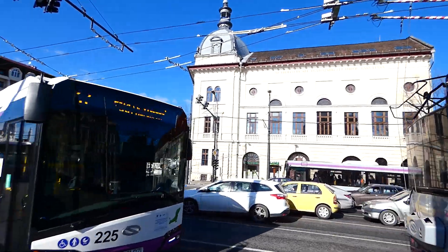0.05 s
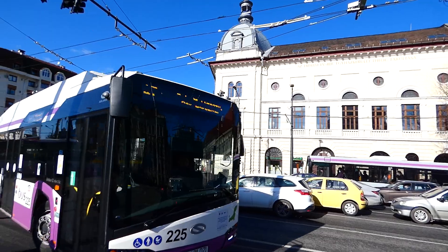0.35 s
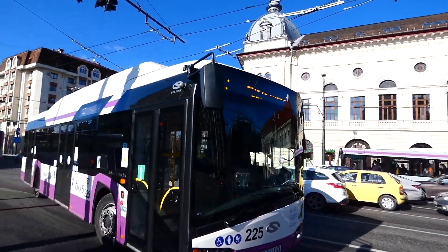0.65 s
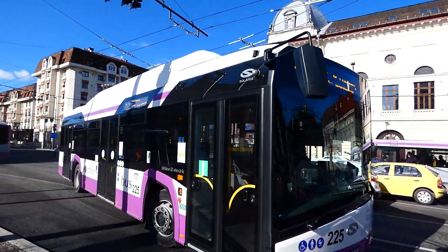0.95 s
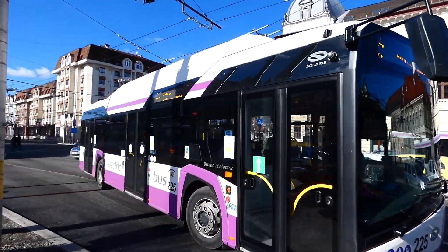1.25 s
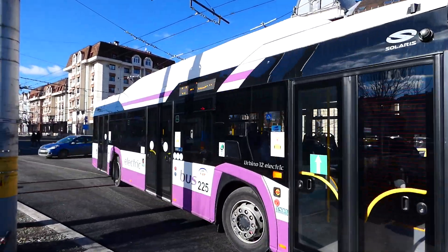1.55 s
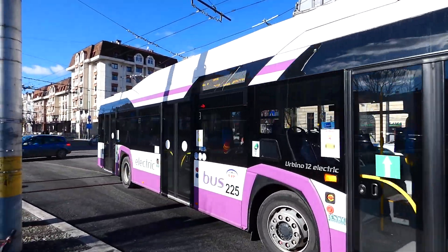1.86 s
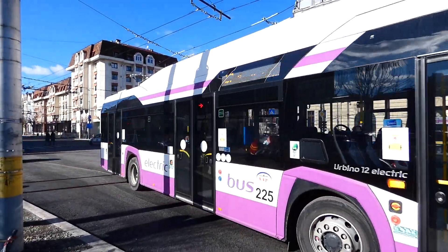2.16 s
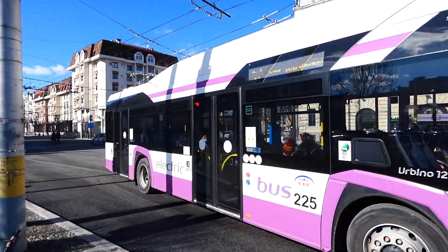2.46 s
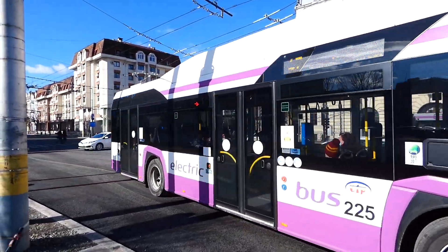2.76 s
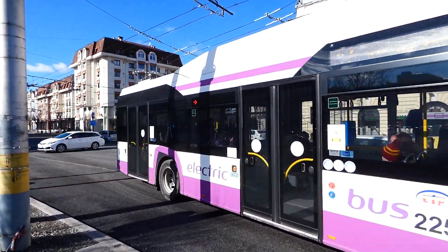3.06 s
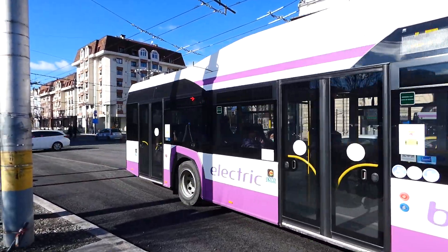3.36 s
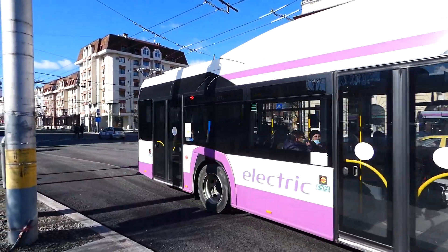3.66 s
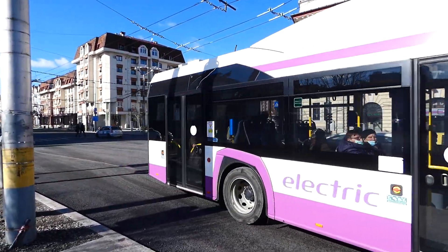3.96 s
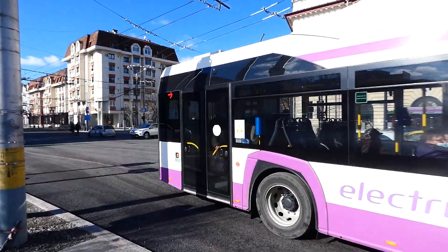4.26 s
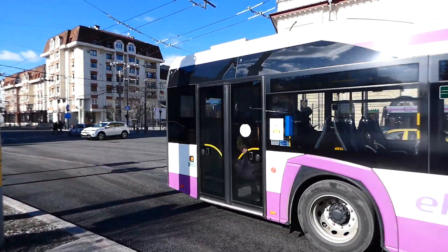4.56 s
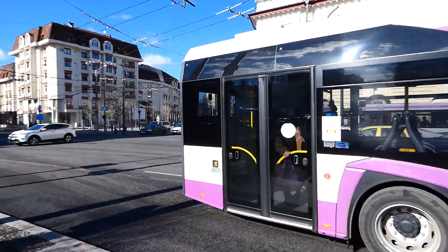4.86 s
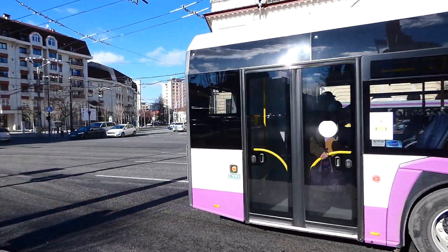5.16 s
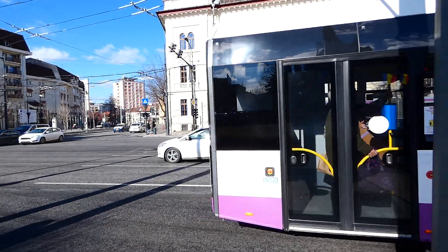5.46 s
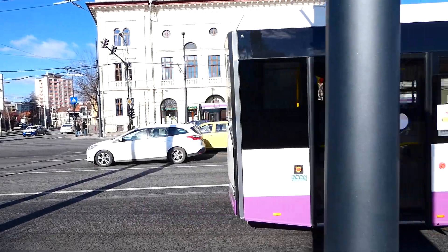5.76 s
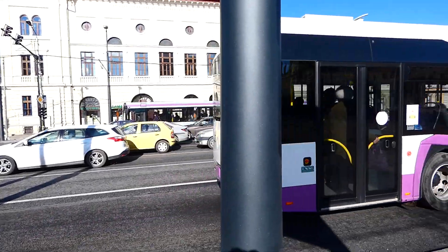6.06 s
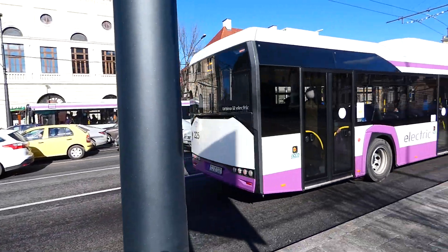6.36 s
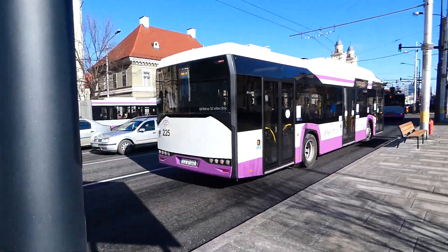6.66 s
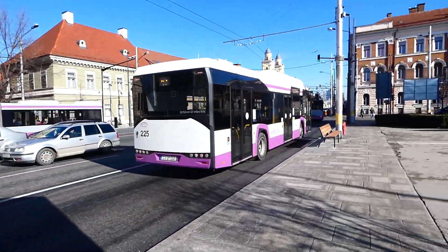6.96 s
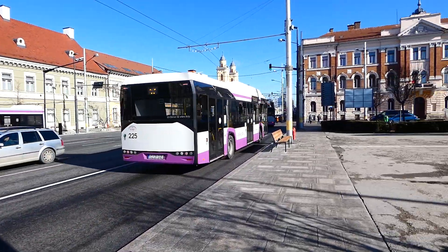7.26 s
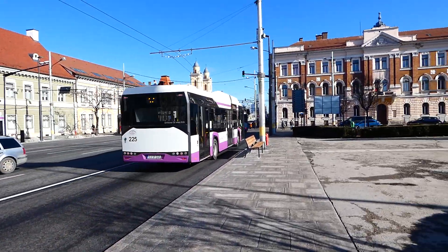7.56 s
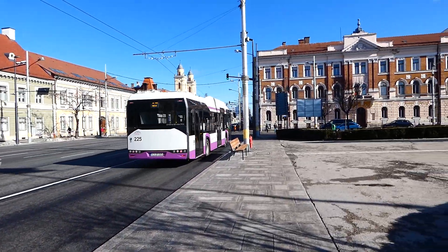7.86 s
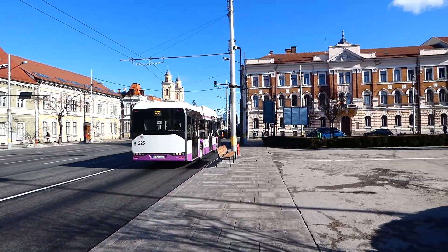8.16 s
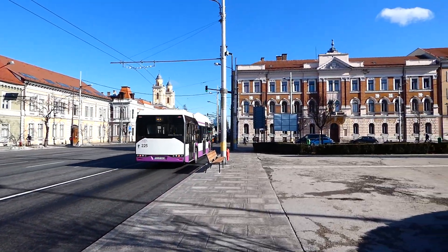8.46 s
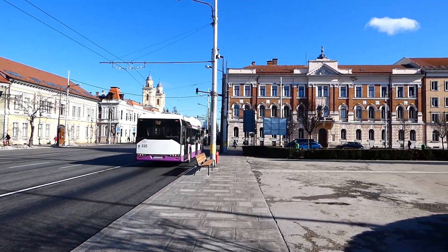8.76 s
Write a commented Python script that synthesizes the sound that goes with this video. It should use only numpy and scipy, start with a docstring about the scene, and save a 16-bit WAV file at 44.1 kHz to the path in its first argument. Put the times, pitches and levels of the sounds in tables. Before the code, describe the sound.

Gusty wind buffets the microphone with irregular thuds and slaps, standing out over the rumble of city traffic. Behind it an electric bus passes close by, humming, its tyres rushing on the asphalt and its drive whining faintly. It gives a short spit of air, a few faint squeaks, then a sharp, ringing air release. A last, softer hiss follows as it moves away and the sound of other cars rises.

```python
"""First come a low hum and the roar of tyres: an electric bus rolls slowly past on a city street.
Its drive sings a thin, gliding whine, something rubs and squeaks, and its air valves let off three
hissing bursts, the second sharp and ringing. Distant engines rumble, and more cars are heard once the
bus has gone by. All along, gusts throw eddies (little swirls of air) against the microphone, and its
automatic volume control turns everything down under the hardest thumps."""
import sys
import numpy as np
from scipy import signal
from scipy.fft import rfft, irfft, next_fast_len
from scipy.io import wavfile
from scipy.ndimage import uniform_filter1d, map_coordinates

SR = 44100
rng = np.random.default_rng(int(sys.argv[2]) if len(sys.argv) > 2 else 0)


def generate_wav(signal):
    """Clip the signal to [-1, 1] and save it as 16-bit WAV at the path in sys.argv[1]."""
    frames = np.transpose(np.atleast_2d(signal))
    scaled = np.clip(frames, -1, 1) * 32767
    pcm = np.round(scaled).astype(np.int16)
    wavfile.write(sys.argv[1], SR, pcm)


N = 392931

# Levels are relative: the functions add their own gains. Pan is left minus right.
# how loud each layer is as time goes by: (time [s], level [dB])
TYRE_LEVELS = [(0, -32.5), (0.42, -29.5), (0.7, -32.5), (1.1, -30), (1.62, -31.5), (1.9, -27), (2.2, -30),
               (2.88, -33), (3.3, -38.5), (3.65, -36.5), (4.2, -33), (4.55, -32), (5.04, -31.5),
               (5.15, -33.5), (6.05, -36), (6.58, -31), (7.0, -34.5), (7.6, -30.5), (8.9, -31.5)]
CAR_LEVELS = [(0, -50), (6.2, -49.5), (7.3, -41), (8.0, -32.5), (8.3, -32), (8.9, -30.5)]
ENGINE_LEVELS = [(0, -35), (1, -27), (2, -26.5), (3.1, -39), (3.35, -38), (3.7, -34), (4.5, -35.5),
                 (5, -30.5), (5.2, -47.5), (6.5, -32.5), (7.1, -29), (8.1, -32), (8.9, -31.5)]
# the tones of the electric drive: (time [s], pitch [Hz], level [dB])
ARCHING_WHINE = [(0.4, 8750, -74), (0.8, 9020, -66), (1.05, 9340, -71), (1.3, 9640, -68.5),
                 (1.55, 9890, -71), (1.75, 10050, -67.5), (1.95, 10100, -65.5), (2.25, 9900, -67.5),
                 (2.6, 9560, -65), (2.8, 9230, -69), (3.0, 8890, -67), (3.3, 8620, -75)]
RISING_WHINE = [(3.25, 6900, -68), (3.5, 7100, -62), (4.1, 7630, -64), (4.5, 7975, -64), (4.57, 8035, -55),
                (4.66, 8115, -66), (4.93, 8350, -63), (5.15, 8550, -71), (5.45, 8820, -68),
                (5.7, 9050, -75), (6.1, 9435, -82), (6.5, 9750, -80)]
GEAR_WHINE = [(1.35, 1040, -53), (1.55, 1050, -50), (1.7, 1065, -54), (1.81, 1080, -43), (1.93, 1095, -48),
              (2.1, 1125, -55)]
OPENING_HUM = [(0, 554, -35), (0.15, 541, -46), (0.45, 543, -37.5)]
FRONT_HUM = [(0.6, 190.3, -37.5), (1.05, 199, -33.5), (1.45, 209, -36)]
REAR_HUM = [(3.5, 216.7, -37), (3.78, 222, -35), (3.95, 223, -36.5), (4.1, 224, -40), (4.32, 226, -38),
            (4.55, 228, -41)]
AXLE_HUM = [(4.15, 195, -41), (4.4, 199, -37.5), (4.6, 201, -37)]
# air let off, the last two rows as one burst; a fade is the time to drop 60 dB:
# (time [s], level [dB], rise [s], blast fade [s], tail level [dB], tail fade [s], ring [dB], pan [dB])
AIR_BURSTS = [(0.346, -19.3, 0.02, 0.33, -16.5, 0.6, -12, -2.5),
              (3.763, -26.5, 0.0105, 0.42, 1.5, 1.6, 3, -4.5),
              (7.602, -28.8, 0.017, 0.85, -2, 1.9, -8, 2.8), (7.805, -38.5, 0.03, 0.45, -9, 0.44, -20, 2)]
# pitches at which the air outlet and the nozzle ring: (pitch [Hz], width [Hz], boost [dB])
OUTLET_RINGS = [(2370, 130, 16.5), (2770, 90, 3), (3520, 110, 6)]
NOZZLE_RINGS = [(5250, 250, 4), (6550, 200, 5), (7050, 380, 8), (7500, 200, 4), (8750, 260, 8)]
# valves snapping open: (time [s], level [dB], centre [Hz], width [Hz], fade [s])
VALVE_SNAPS = [(0.346, -24, 6000, 3400, .018), (3.757, -29, 6400, 2200, .025),
               (7.599, -37, 4800, 2600, .16)]
# rubs near the wheels: (time [s], level [dB])
SQUEAKS = [(1.09, -47), (1.19, -43), (1.285, -41), (1.38, -42), (1.455, -41), (1.53, -44), (1.62, -43.5),
           (1.71, -43), (2.92, -46)]
# gusts; deep ones thud, shallow ones slap: (start [s], length [s], level [dB], depth [dB])
GUSTS = [(0.3, 0.16, -24.5, -6.5), (0.477, 0.1, -22, -9), (0.535, 0.12, -14, -3.5),
         (0.811, 0.19, -26.5, 4.5), (1.126, 0.075, -26, 8.5), (1.468, 0.092, -16.5, -5.5),
         (1.69, 0.042, -23.5, 4.5), (1.979, 0.694, -17, -2), (2.703, 0.064, -17.5, 5),
         (2.791, 0.052, -20, 0.5), (2.845, 0.39, -16.5, 1), (3.447, 0.1, -25.5, 6), (4.14, 0.04, -28.5, 6),
         (4.29, 0.35, -31, -3), (4.627, 0.06, -19.5, 8), (4.823, 0.026, -17, -5.5),
         (5.043, 0.089, -12, -0.5), (5.155, 0.063, -14.5, 0), (5.275, 0.21, -17, -3),
         (5.515, 0.14, -16, -0.5), (5.715, 0.18, -29.5, 9), (5.891, 0.185, -23, 9.5),
         (6.105, 0.269, -22, -3.5), (6.614, 0.14, -26, 3.5), (6.763, 0.15, -18.5, -2),
         (7.116, 0.029, -18.5, 6.5), (7.175, 0.11, -22, -5), (7.44, 0.345, -21.5, -6.5),
         (7.802, 0.13, -21.5, 2.5), (7.971, 0.14, -24, -3.5)]
# the biggest single eddies: (time [s], level [dB], pitch [Hz], half length [s])
THUMPS = [(0.234, -11.5, 320, 0.0025), (0.503, -18, 320, 0.0035), (0.574, -11.5, 268, 0.0081),
          (0.62, -15, 150, 0.008), (0.655, -9, 130, 0.0062), (0.907, -15, 300, .005),
          (0.929, -16.5, 276, 0.0078), (1.137, -17, 330, 0.0036), (1.289, -11, 253, 0.0031),
          (1.419, -10.5, 178.6, 0.0034), (1.505, -12, 273, 0.0076), (1.568, -13, 159, 0.0059),
          (1.622, -13.5, 333, 0.0036), (1.731, -16.5, 220, 0.0035), (2.011, -14, 240, 0.0056),
          (2.07, -11, 171, 0.008), (2.589, -8, 192, 0.005), (2.747, -16, 150, .008),
          (2.883, -12, 346, 0.0064), (2.921, -10, 235, 0.0096), (3.095, -16, 130, 0.0094),
          (3.12, -8, 181, .006), (3.288, -8.5, 224, 0.0041), (3.457, -14, 210, .004),
          (3.471, -13, 330, 0.0037), (3.49, -5, 320, 0.0026), (3.506, -16, 248, 0.0045),
          (3.514, -9, 347, 0.006), (3.549, -17, 302, 0.0032), (4.135, -19, 150, 0.0053),
          (4.161, -21, 320, 0.0055), (4.655, -13.5, 130, 0.0073), (4.845, -13.5, 310, 0.0076),
          (5.07, -10.5, 275, .005), (5.106, -5, 168, 0.0059), (5.125, -3.5, 316, 0.0048),
          (5.18, -6, 228, 0.0028), (5.314, -4.5, 293, 0.0036), (5.437, -7, 243, 0.0046),
          (5.603, -6, 140, .007), (5.895, -10, 146, 0.0058), (5.97, -14.5, 232, .007),
          (6.075, -18, 257, .006), (6.321, -15, 272, 0.0056), (6.655, -17, 154, 0.006),
          (6.716, -12, 208, 0.0056), (6.81, -11, 158, 0.0044), (6.901, -19, 320, 0.0097),
          (7.149, -13, 243, 0.0065), (7.234, -16, 310, 0.0049), (7.312, -10.5, 295, 0.0038),
          (7.541, -10, 297, 0.0054), (7.68, -18, 138, 0.0065), (7.857, -14, 250, 0.005),
          (7.895, -17, 130, .008)]
# hard eddies that hit one side of the microphone: (time [s], level [dB], pan [dB])
CRACKS = [(0.575, -2.5, -15), (1.137, -5, -12), (1.621, -10, -17), (2.112, -6, -20), (2.19, -8.5, -15),
          (2.371, -6, -19), (2.649, -8, -8), (2.955, 0, -25), (3.088, -12, -20), (3.096, -3, -11),
          (3.157, -10.5, -15), (3.189, -3, -32), (3.202, -6.5, -12), (3.222, -5, -25), (3.282, -10.5, -20),
          (3.511, -6.5, 17), (5.526, -9, -16), (5.6, -8.5, -11), (6.809, -11, -7), (6.849, -6, -8),
          (7.135, -11.5, -12), (7.148, -23, -8)]
# how each noise shares its strength from bass to treble: (frequency [Hz], level [dB])
ROAR_SPECTRUM = [(100, -30.5), (300, -13), (520, -0.5), (800, -1), (1300, -1.5), (2000, -8), (3000, -17.5),
                 (5000, -39.5), (10000, -55.5)]
HISS_SPECTRUM = [(800, -27.5), (2000, 0), (3000, 0.5), (4200, -4.5), (5500, -8.5), (7200, -11.5),
                 (8200, -19), (9900, -25), (10800, -44), (15000, -61)]
JET_SPECTRUM = [(500, -23), (1500, 5), (2400, 1.5), (3500, 0.5), (5000, -7), (5900, -9.5), (7100, -6.5),
                (8200, -14), (10500, -18.5), (11500, -30), (15000, -41)]
THUD_SPECTRUM = [(20, -35), (40, -42), (60, -22), (110, -4), (170, -1), (260, -1), (400, -8), (600, -14),
                 (1000, -24.5), (2000, -41), (5000, -73), (12000, -92)]
SLAP_SPECTRUM = [(40, -51), (120, -16), (250, -11), (380, -4.5), (600, -8), (1000, -24.5), (2000, -36),
                 (5000, -62), (12000, -94)]
CRACK_SPECTRUM = [(40, -38.5), (150, -14), (400, 5.5), (800, -2.5), (1400, -14.5), (2500, -33), (5000, -51),
                  (12000, -74.5)]
CAR_SPECTRUM = [(200, -31), (450, -7), (750, 2), (1000, -3.5), (1400, -4), (2200, -26), (4000, -34.5),
                (7000, -31.5), (9500, -41), (11000, -65)]
ENGINE_SPECTRUM = [(20, -34.5), (40, -16), (65, -3.5), (120, 0.5), (200, 3), (320, 1), (500, -10),
                   (900, -16), (2500, -66.5)]
# how alike left and right sound: (frequency [Hz], likeness [0 to 1])
STREET_ALIKE = [(60, 0.94), (500, 0.93), (1100, 0.8), (5000, 0.88), (10000, 0.39)]
WIND_ALIKE = [(60, 0.9), (150, 0.97), (270, 0.9), (450, 0.48), (700, 0), (2000, 0)]

TIME = np.arange(N) / SR


def tyres(pass_s=4.47, turn_s=0.99):
    """Tyres roar and hiss on the road; once the bus is past they sound duller and further left."""
    level_db, = curves(TYRE_LEVELS)
    past = (1 + np.tanh((TIME - pass_s) / turn_s)) / 2  # 0 as the bus comes, 1 as it leaves
    hiss_db = level_db - 6 - 5.5 * past
    roar = amp(level_db + 2 + 0.42 * wobble(18)) * street_noise(ROAR_SPECTRUM, patchy_db=1)
    hiss = amp(hiss_db + 0.21 * wobble(25)) * street_noise(HISS_SPECTRUM, patchy_db=1.03)
    pan_db = 1.2 + 1.3 * past
    return (roar + hiss) * amp(np.array([pan_db, -pan_db]) / 2)


def drive():
    """The electric drive whines and hums, its tones mostly rising as the bus gathers speed."""
    high = whine(ARCHING_WHINE, width_hz=280, direct_db=-17, echo_db=-0.5, waver_db=3)
    high += whine(RISING_WHINE, width_hz=170, direct_db=-14, echo_db=0, waver_db=2, pan_db=-4)
    low = whine(GEAR_WHINE, width_hz=30, direct_db=1.5, echo_db=3)
    for hum in (FRONT_HUM, REAR_HUM, AXLE_HUM):
        low += whine(hum, width_hz=42, direct_db=-1.5, echo_db=2.5, waver_db=-0.5)
    low += whine(OPENING_HUM, width_hz=49, direct_db=-3, echo_db=2)
    return high + low


def whine(track, width_hz, direct_db, echo_db, waver_db=0, pan_db=0):
    """One gliding tone: a clean part, plus a part blurred by echoes from the road and walls."""
    pitch_hz, level_db = curves(track)
    fade = np.clip(np.minimum(TIME - track[0][0], track[-1][0] - TIME) / 0.05, 0, 1)
    phase = 2 * np.pi * np.cumsum(pitch_hz) / SR
    blur = [wobble(width_hz) * np.sin(phase) + wobble(width_hz) * np.cos(phase) for _ in range(2)]
    direct = np.sqrt(2) * np.sin(phase)
    tone = amp(direct_db) * direct + amp(echo_db) * spread(np.array(blur), STREET_ALIKE)
    return fade * amp(level_db + waver_db * wobble(18)) * tone * panned(pan_db)


def air_valves(gain_db=-9, sputter_db=0.65):
    """A valve opens, the first blast rings in its outlet, and the air drains in a sputtering hiss."""
    jet = shaped_noise(lambda hz: amp(along(JET_SPECTRUM, hz)) * (1 + ringing(hz, NOZZLE_RINGS)))
    jet *= amp(sputter_db * wobble(150))
    ring = filtered(jet, lambda hz: ringing(hz, OUTLET_RINGS))
    out = np.zeros((2, N))
    for start, db, rise_s, fade_s, tail_db, tail_s, ring_db, pan_db in AIR_BURSTS:
        age = np.maximum(TIME - start, 0)
        opening = np.exp(-(np.minimum(TIME - start, 0) / rise_s) ** 2)
        blast = amp(-60 * age / fade_s) * (jet + amp(ring_db) * ring)
        tail = amp(tail_db - 60 * age / tail_s) * jet
        out += amp(db + gain_db) * panned(pan_db) * opening * (blast + tail)
    return out


def valve_snaps(rise_s=0.0018):
    """The first air through a valve is a short, bright spit, drawn out by echoes when the bus is far."""
    out = np.zeros((2, N))
    for start, db, centre_hz, width_hz, fade_s in VALVE_SNAPS:
        spit = shaped_noise(lambda hz: 1 / (1 + ((hz - centre_hz) / width_hz) ** 2) ** 2)
        age = TIME - start
        opening = np.clip(1 + age / rise_s, 0, 1)
        out += amp(db - 60 * np.maximum(age, 0) / fade_s) * opening * spit
    return out


def squeaks(centre_hz=4800, width_hz=340):
    """For a moment something rubs about eleven times a second, then once more later on."""
    strokes = sum(amp(db) * bell(TIME - when, 0.014) for when, db in SQUEAKS)
    return strokes * shaped_noise(lambda hz: bell(hz - centre_hz, width_hz))


def wind(breeze_db=-41.5, hard_db=-15, rise_s=0.0089, fall_s=0.039):
    """Gusts flutter over the microphone; the harder they blow, the more bright slaps they carry."""
    power, depth = np.full(N, amp(breeze_db) ** 2), np.zeros(N)
    for start, length, db, deep_db in GUSTS:
        age = TIME - start
        shape = np.clip(age / rise_s, 0, 1) * np.exp(-np.maximum(age - length, 0) / fall_s)
        gust_power = (amp(db - 0.5) * shape) ** 2
        power += gust_power
        depth += deep_db * gust_power
    depth_db = depth / power  # the strongest gust counts most
    flutter = amp(2 * wobble(50) + wobble(13))
    strength = np.sqrt(power) * flutter
    hardness = np.tanh(strength / amp(hard_db))
    thuds = amp(depth_db / 2) * eddies(THUD_SPECTRUM, per_second=650, uneven_db=3.5) * panned(-0.2)
    # the right side faces the wind and takes more of the slaps
    slaps = eddies(SLAP_SPECTRUM, per_second=550, uneven_db=8) * panned(-5)
    return strength * (thuds + amp(-8 - depth_db) * hardness * slaps)


def eddies(spectrum, per_second, uneven_db):
    """Many eddies, big and small, each make a dip in air pressure; together they churn steadily."""
    hits = (rng.random((2, N)) < per_second / SR) * amp(uneven_db * rng.standard_normal((2, N)))
    dips = signal.fftconvolve(hits.mean() - hits, pulse(spectrum)[None], axes=1)[:, :N]
    churn = spread(dips, WIND_ALIKE)
    local_power = uniform_filter1d(np.mean(churn ** 2, axis=0), size=900)
    return churn / np.sqrt(np.abs(local_power) + 1e-6)


def wind_thumps(gain_db=-1, side_lag_s=0.0003, wander=0.39):
    """A big eddy booms briefly on the microphone, reaching its two sides slightly out of step."""
    t = np.arange(-(SR // 25), SR // 25) / SR
    out = np.zeros((2, N))
    for when, db, pitch_hz, half_s in THUMPS:
        offset, skew, bend = rng.standard_normal(3)
        phase = 2 * np.pi * (pitch_hz * t + offset) + wander * bend * (t / half_s) ** 2
        lag = np.pi * pitch_hz * side_lag_s * skew * np.array([[1], [-1]])
        first = round((when + t[0]) * SR)
        out[:, first:first + len(t)] += amp(db + gain_db) * bell(t, half_s) * np.sin(phase + lag)
    return out


def wind_cracks(gain_db=-3, tumble_db=-11, fade_s=0.085, per_second=700):
    """A hard eddy snaps against one side of the microphone, and smaller ones tumble after it."""
    age = np.arange(SR // 20) / SR
    hits = np.zeros((2, N))
    for start, db, pan_db in CRACKS:
        tumble = (rng.random(len(age)) < per_second / SR) * rng.standard_normal(len(age))
        tumble *= amp(tumble_db - 60 * age / fade_s)
        tumble[0] = 1  # the hard eddy itself
        sides = panned(pan_db)
        first = round(start * SR)
        hits[:, first:first + len(age)] += amp(db + gain_db) * sides / sides.mean() * tumble
    return -signal.fftconvolve(hits, pulse(CRACK_SPECTRUM)[None], axes=1)[:, :N]


def cars():
    """The bus uncovers the far lanes, where car tyres sing on the asphalt."""
    level_db, = curves(CAR_LEVELS)
    return amp(level_db + 0.6 * wobble(9.8)) * street_noise(CAR_SPECTRUM, patchy_db=3) * panned(1.6)


def distant_engines():
    """Engines rumble all around, swelling and sinking."""
    level_db, = curves(ENGINE_LEVELS)
    return amp(level_db) * street_noise(ENGINE_SPECTRUM, patchy_db=1.5)


def street_noise(spectrum, patchy_db):
    """Stereo noise with random louder and softer patches across pitch and time."""
    grid = signal.stft(rng.standard_normal((2, N)), nperseg=512)[2]
    patches = uniform_filter1d(rng.standard_normal(grid.shape[1:]), size=5, axis=0)
    patches = uniform_filter1d(patches, size=14, axis=1)
    pair = signal.istft(grid * amp(patchy_db * unit(patches)), nperseg=512)[1][:, :N]
    return spread(filtered(pair, lambda hz: amp(along(spectrum, hz))), STREET_ALIKE)


def shaped_noise(response):
    """Steady stereo noise, coloured by a gain for each frequency."""
    return spread(filtered(rng.standard_normal((2, N)), response), STREET_ALIKE)


def spread(pair, alike):
    """Mix two unrelated signals into a left and right of a given likeness."""
    def shares(hz):
        angle = np.arccos(np.clip(along(alike, hz), -1, 1)) / 2
        return np.array([np.cos(angle), np.sin(angle)])
    mid, side = filtered(pair, shares)
    return unit(np.array([mid + side, mid - side]))


def pulse(spectrum, size=4096):
    """One knock with this spectrum and a peak of 1."""
    gains = amp(along(spectrum, np.fft.rfftfreq(size, 1 / SR)))
    cepstrum = irfft(np.log(gains))
    # folding this moves the energy to the start of the knock (minimum phase)
    cepstrum[1:size // 2] *= 2
    cepstrum[size // 2 + 1:] = 0
    knock = irfft(np.exp(rfft(cepstrum)))
    return knock / np.abs(knock).max()


def ringing(hz, peaks):
    """The extra gain near each pitch at which a part rings."""
    return sum((amp(db) - 1) / (1 + (2 * (hz - pitch) / width) ** 2) for pitch, width, db in peaks)


def filtered(x, response):
    """Turn each frequency of x up or down by response(hz)."""
    size = next_fast_len(N + SR // 4)
    return irfft(rfft(x, size) * response(np.fft.rfftfreq(size, 1 / SR)), size)[..., :N]


def wobble(rate):
    """A smooth curve through `rate` random values a second."""
    return map_coordinates(rng.standard_normal(int(N * rate / SR) + 4), [TIME * rate])


def curves(rows):
    """One value per sample for each column after the time."""
    times, *columns = np.transpose(rows)
    return [np.interp(TIME, times, column) for column in columns]


def along(points, hz):
    """Read between (frequency, value) points on a log scale."""
    frequencies, values = np.transpose(points)
    return np.interp(np.log(hz + 1), np.log(frequencies + 1), values)


def bell(x, width):
    """A smooth hump, 1 high at x = 0."""
    return np.exp(-0.5 * (x / width) ** 2)


def panned(pan_db):
    """Left and right gains; a positive pan leans left."""
    return amp(np.array([[pan_db], [-pan_db]]) / 2)


def unit(x):
    """Scale to an average power of 1."""
    return x / np.sqrt(np.mean(x ** 2) + 1e-20)


def amp(db):
    """Decibels to gain."""
    return 10 ** (np.asarray(db) / 20)


def volume_control(x, threshold_db=-18, slope=0.36, follow_s=0.014, recover_db_per_s=40):
    """The volume drops quickly under a loud thump and creeps back, so gusts push the street down."""
    memory = np.exp(-1 / (follow_s * SR))
    power = signal.lfilter([1 - memory], [1, -memory], np.mean(x ** 2, axis=0))
    # hold each peak, then let it sink at a steady rate
    sag_db = recover_db_per_s * TIME
    held_db = np.maximum.accumulate(10 * np.log10(power + 1e-12) + sag_db) - sag_db
    gain = (1 + amp(held_db - threshold_db) ** 2) ** -slope
    return x * uniform_filter1d(gain, size=800)


def scene():
    """The bus, the street and the wind meet at the microphone."""
    bus = drive() + squeaks() + valve_snaps() + air_valves() + tyres()
    return bus + distant_engines() + cars() + wind() + wind_thumps() + wind_cracks()


def record(dry, low_cut_hz=42, top_hz=15200):
    """The microphone adjusts its volume, softens the deepest bass and cuts off the highest treble."""
    levelled = volume_control(dry)
    return filtered(levelled, lambda hz: (hz < top_hz) * hz ** 2 / np.hypot(hz ** 2, low_cut_hz ** 2))


dry = scene()
out = record(dry)
generate_wav(out)
```